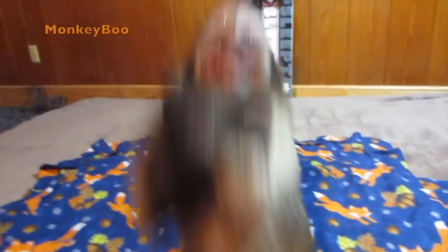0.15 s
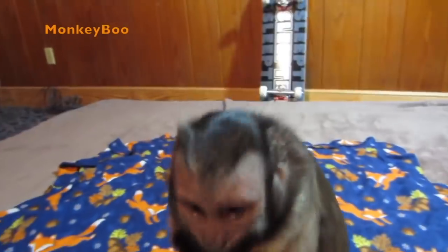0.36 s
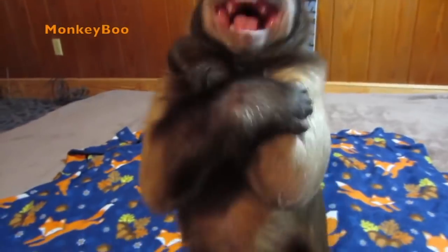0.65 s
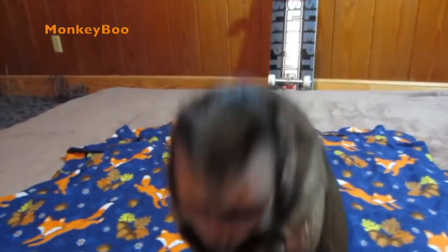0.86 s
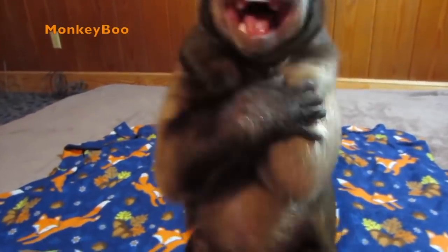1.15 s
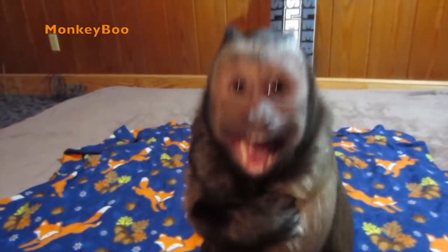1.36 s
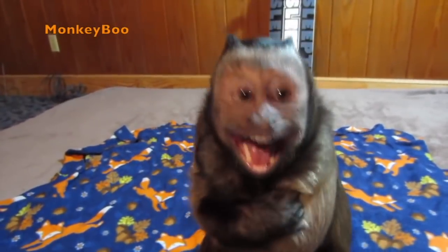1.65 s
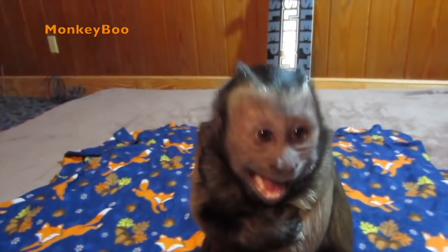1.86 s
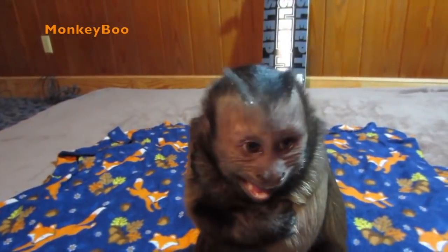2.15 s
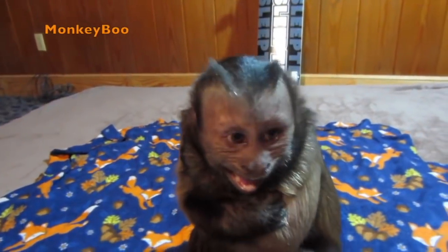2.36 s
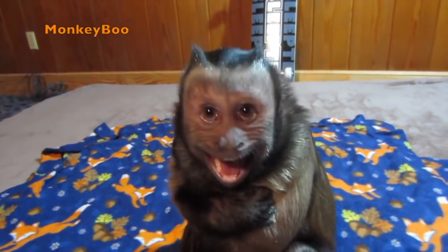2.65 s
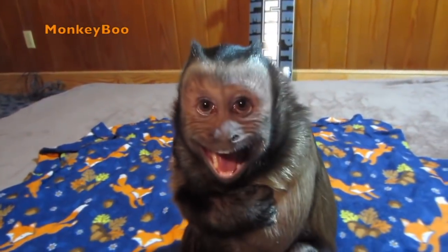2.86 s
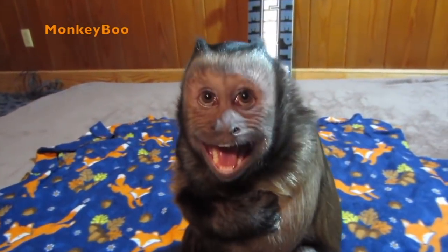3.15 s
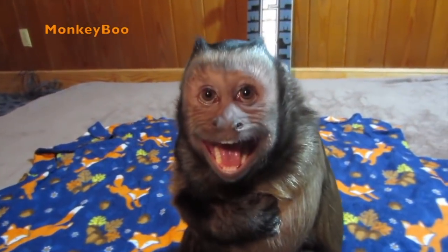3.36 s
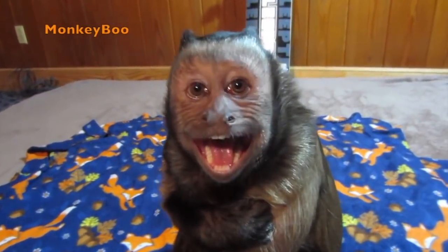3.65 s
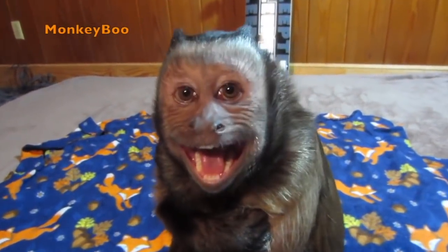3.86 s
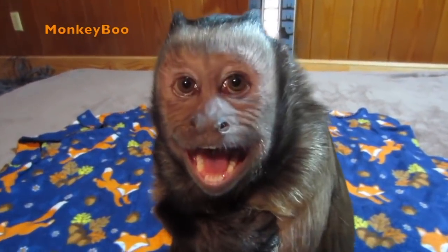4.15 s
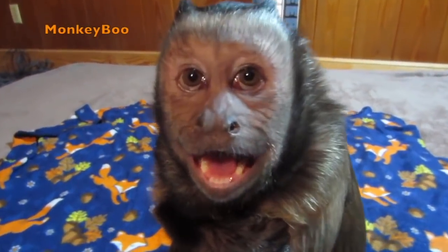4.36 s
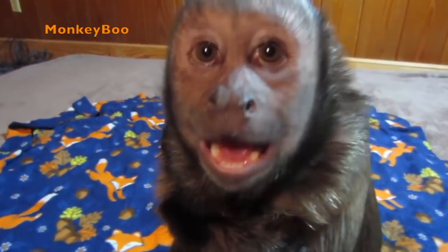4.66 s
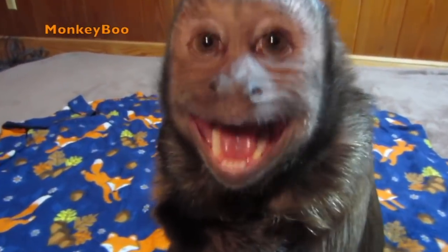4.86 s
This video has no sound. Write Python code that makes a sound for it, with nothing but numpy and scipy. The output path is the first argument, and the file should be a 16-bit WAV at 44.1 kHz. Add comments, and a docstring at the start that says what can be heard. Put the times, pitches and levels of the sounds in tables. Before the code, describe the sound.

High, piercing monkey whistles: a quick chattering run, a torn screech, three drawn-out calls, a falling squeak and final little chirps in a quiet room.

```python
"""Monkey chirping in a panelled room

A small monkey on a bed chirps close by: a high gliding whistle, built from a few sine waves.
Slow pulses through mouth resonances make short low rasps; a torn whistle with hiss makes one screech.
Long calls plunge at the end. A falling squeak, faint clicks, a soft bump and a rustle, made of
tones and shaped noise, come between. Fading noise gives the room's echo, over quiet tone and rumble."""
import sys
import numpy as np
from scipy import signal
from scipy.fft import rfft, irfft, next_fast_len
from scipy.io import wavfile
from scipy.ndimage import uniform_filter1d, map_coordinates

SR = 44100
rng = np.random.default_rng(int(sys.argv[2]) if len(sys.argv) > 2 else 0)


def store_pcm(level_fs):
    """Save levels as 16-bit WAV."""
    pcm = np.round(np.clip(level_fs, -1, 1) * 32767).astype(np.int16)
    wavfile.write(sys.argv[1], SR, np.atleast_2d(pcm).T)


N = 221539
TIME = np.arange(N) / SR
TOP_HZ = 15780  # no sound is kept above this

# short arched chirps: start t/s, crest t/s, end t/s, first f/Hz, crest f/Hz, last f/Hz,
# mid-chirp level/dB, swell from start to end/dB, octave level at the crest pitch/dB
CHIRPS = [(0.022, 0.036, .059, 3043, 3285, 2470, -27.5, -2, -31.5),
          (0.149, 0.161, .178, 2930, 3160, 3014, -31.5, 6.5, -35),
          (0.213, 0.253, .258, 2697, 3210, 3040, -34.5, -4, -36.5),
          (0.286, 0.303, .312, 3290, 3390, 3080, -31, -1, -29),
          (0.361, 0.363, .398, 3180, 3274, 2573, -27, 1.5, -35),
          (0.398, 0.41, .410, 2644, 2580, 2590, -39, 0, -41.5),
          (0.424, 0.436, .458, 2760, 2833, 2554, -36.5, -1, -42),
          (0.69, .713, .734, 3570, 3796, 3114, -27.5, 8, -30),
          (.757, 0.801, .830, 3290, 3838, 3560, -31, -0.5, -26.5),
          (0.852, 0.898, .920, 3276, 3530, 3330, -30, 7.5, -32.5),
          (3.937, 3.965, 3.995, 3790, 3694, 2755, -35, 18, -41.5),
          (4.101, 4.121, 4.171, 3283, 3410, 2734, -29.5, 13, -39.5),
          (4.822, 4.845, 4.854, 2980, 3170, 2550, -30.5, 10, -41.5),
          (4.908, 4.925, 4.933, 2870, 3200, 2570, -29, -9, -42.5),
          (4.962, 4.98, 5.001, 3145, 3184, 2570, -26, 4.5, -35)]
FALL_POWER = 1.9  # after the crest the pitch falls ever faster
TUMBLE_DB = 8.5  # strength a chirp loses as its pitch tumbles
DULLING_DB_PER_OCTAVE = 20  # the octave tone and overtones fade as the pitch leaves the crest

# pitch of a short call that rises and sags, and of the high call that leads into the screech: t/s, f/Hz
SHORT_PITCH = [(0.483, 2710), (0.519, 2930), (0.539, 3350), (0.557, 3480), (0.597, 3343), (0.611, 3064),
               (0.655, 2950)]
HIGH_PITCH = [(0.959, 3190), (0.976, 3450), (0.996, 3466), (1.024, 2970), (1.046, 3323), (1.144, 3963),
              (1.198, 3713), (1.246, 3992), (1.278, 3775), (1.338, 4018), (1.378, 3918), (1.444, 3929),
              (1.51, 3778), (1.58, 3683), (1.622, 3898), (1.653, 3610)]
# strength of those calls: t/s, fundamental level/dB, octave level/dB
SHORT_LEVEL = [(0.483, -44, -50.5), (0.591, -24.5, -34.5), (0.615, -26.5, -40.5), (0.631, -32.5, -39.5),
               (0.655, -43.5, -70.5)]
HIGH_LEVEL = [(0.959, -33, -35), (1.042, -34.5, -39), (1.072, -41.5, -55.5), (1.124, -25, -33),
              (1.146, -22.5, -36), (1.2, -35.5, -27.5), (1.308, -24.5, -37), (1.334, -24, -27),
              (1.37, -27, -33.5), (1.396, -26, -53.5), (1.408, -29, -37), (1.586, -26.5, -31),
              (1.598, -28.5, -45.5), (1.653, -26, -32)]
# pitch of three long sagging calls, one list each: t/s, f/Hz
LONG_PITCH = [
    [(1.908, 3940), (1.938, 4020), (1.99, 3360), (2.042, 3988), (2.098, 3814), (2.168, 3840), (2.23, 3493),
     (2.268, 3692), (2.302, 3664), (2.342, 3272), (2.394, 3577), (2.47, 2740)],
    [(2.647, 3860), (2.675, 3994), (2.719, 3317), (2.749, 3650), (2.777, 3687), (2.813, 3496),
     (2.841, 3700), (2.869, 3555), (2.907, 3653), (2.979, 3409), (3.015, 3480), (3.049, 3292), (3.07, 2878)],
    [(3.282, 3704), (3.308, 3630), (3.346, 3100), (3.362, 2735), (3.382, 2717), (3.398, 3135),
     (3.434, 3340), (3.474, 3277), (3.506, 3371), (3.566, 3356), (3.67, 3117), (3.685, 2854)],
]
# their strength, one list each: t/s, fundamental level/dB, octave level/dB
LONG_LEVEL = [
    [(1.908, -49.5, -73.5), (1.92, -37.5, -59.5), (1.954, -37, -45), (2.194, -29.5, -43),
     (2.235, -27.5, -35), (2.43, -28, -33), (2.47, -27.5, -38.5)],
    [(2.647, -37.5, -56.5), (2.665, -29.5, -53.5), (2.713, -27.5, -34), (2.751, -29, -38.5),
     (2.941, -25.5, -35.5), (3.029, -26.5, -37), (3.049, -26.5, -33), (3.07, -23, -37.5)],
    [(3.282, -41, -51.5), (3.312, -27.5, -33), (3.338, -31.5, -38.5), (3.36, -22.5, -40.5),
     (3.426, -33, -41.5), (3.658, -27.5, -36.5), (3.685, -25, -38.5)],
]
# each long call ends in the same plunge: length, fall in pitch, fall in level, roughness (share of pitch)
PLUNGE_S, PLUNGE_OCTAVES, PLUNGE_DB, PLUNGE_JITTER = 0.029, 0.41, 25.5, 0.083
# a whistle starts with its fundamental a little strong and its overtones weak, and settles this fast
BLOOM_S, FIRST_BLOOM_DB, OVERTONE_BLOOM_DB = 0.0014, -1.5, 18.5
# third and fourth harmonics of the whistle, compared with its octave: f/Hz, level/dB
OVERTONES = [(8300, -9), (9700, -13), (11900, -26.5), (12800, -35.5), (14300, -25.5), (16000, -37)]

# the voice breaks into a low rasp: start t/s, end t/s, first f/Hz, last f/Hz, level/dB,
# fundamental level/dB, mouth resonance f/Hz, jitter/share of pitch
RASPS = [(0.176, 0.213, 1042, 864, -44, -53.5, 2420, 0.1),
         (0.257, 0.289, 1000, 910, -39.5, -50, 2580, 0.08), (0.311, 0.36, 985, 897, -32, -47, 2807, 0.031),
         (0.409, 0.421, 1060, 919, -45, -49.5, 2870, .03), (0.457, 0.48, 1280, 1017, -48, -50, 2674, .012),
         (0.73, 0.753, 1485, 1144, -35.5, -44, 2620, 0.031),
         (0.828, 0.857, 1034, 958, -33.5, -44.5, 3970, 0.047),
         (0.919, 0.958, 979, 893, -30.5, -44, 4220, 0.052),
         (4.945, 4.957, 2200, 1257, -52, -51, 3630, 0.0064)]
# the screech: t/s, level of the whole screech/dB, centre f/Hz
SCREECH = [(1.648, -39, 3640), (1.654, -30, 3500), (1.731, -30, 3500), (1.749, -27, 2970),
           (1.767, -31, 2664), (1.792, -51.5, 2474)]
# hiss in the screech: f/Hz, level/dB per Hz
SCREECH_HISS = [(1800, -19.5), (4200, 0), (5400, -5.5), (7800, -1.5), (11000, -13.5), (15500, -28.5)]
# the falling squeak: t/s, pitch f/Hz, level/dB, extra overtone level/dB
SQUEAK = [(4.584, 2916, -63, -17.5), (4.590, 2491, -21.5, -31.5), (4.593, 2107, -21, -41),
          (4.599, 1851, -36, 2), (4.608, 1319, -27.5, -11), (4.622, 785.5, -29.5, 6),
          (4.627, 523.6, -34, -6.5), (4.645, 197, -40.5, 9), (4.664, 150, -56.5, -16)]
# the voice drops away after a whistle: start t/s, first f/Hz, starting level/dB
DROPS = [(2.489, 1032, -43), (3.098, 965, -43), (3.702, 1029, -42), (3.992, 1306, -42),
         (4.169, 1400, -37.5)]
DROP_S, DROP_END_HZ = .028, 443  # every drop lasts as long and ends as low
# faint clicks: some are crackles of the overdriven limiter at the loudest moments of the calls,
# the late ones mouth clicks: t/s, level before the common snap_db cut/dB
CLICKS = [(0.056, -29), (2.434, -38), (3.058, -34.5), (3.364, -39.5), (3.681, -38.5), (4.765, -40),
          (4.814, -40.5), (4.853, -36), (4.89, -35)]
# how a wide open mouth colours the voice: f/Hz, level/dB
OPEN_MOUTH = [(500, -20.5), (1800, -12.5), (2800, -6.5), (5200, -8.5), (7400, -4), (8400, -17),
              (10000, -20), (11500, -39.5), (15500, -45)]
# how a relaxed mouth colours the voice: f/Hz, level/dB
SLACK_MOUTH = [(120, -9.5), (560, -14.5), (850, 3), (1250, -5.5), (1800, -16.5), (2700, 1.5), (4000, -19.5),
               (9000, -68.5)]

# time the room's echo takes to fade by 60 dB: f/Hz, fading time/s
ROOM = [(300, 0.84), (2500, 0.44), (14000, 0.58)]
# colour of the quiet room: f/Hz, level/dB per Hz
ROOM_TONE = [(30, -0.5), (300, -7.5), (4000, -18.5), (15500, -38.5)]
# strength of the low rumble: t/s, level/dB
RUMBLE = [(0, -77.5), (4.35, -94.5), (4.43, -69), (5, -72.5)]


def amp(db):
    """Turn decibels into a plain gain."""
    return 10 ** (np.asarray(db) / 20)


def unit(x):
    """Scale a sound to rms 1."""
    return x / np.sqrt(np.mean(x ** 2) + 1e-20)


def along(points, hz):
    """Read a (Hz, value) curve with straight lines on a log frequency axis."""
    f, value = np.transpose(points)
    return np.interp(np.log(hz + 1), np.log(f + 1), value)


def curves(rows, t):
    """Read each column after the time column at the times t."""
    s, *columns = np.transpose(rows)
    return [np.interp(t, s, column) for column in columns]


def wobble(t, rate):
    """A smooth random curve with this many random points a second."""
    return map_coordinates(rng.standard_normal(8192), [(t - t[0]) * rate], mode="wrap")


def span(start, end, edge):
    """Sample numbers, times and soft-edged gate (a fade in and out) of one sound."""
    i = np.flatnonzero((TIME > start - edge) & (TIME < end + edge))
    t = TIME[i]
    inside = np.minimum(t - start, end - t) / edge
    return i, t, .5 + .5 * np.sin(np.pi / 2 * np.clip(inside, -1, 1))


def phase_of(hz):
    """Add up a moving pitch into a running phase."""
    return 2 * np.pi * np.cumsum(hz) / SR


def ring(x, hz, width_hz):
    """Let a sound excite one resonance."""
    b, a = signal.iirpeak(hz, hz / width_hz, SR)
    return signal.lfilter(b, a, x)


def coloured(x, spectrum):
    """Filter a sound to a given spectrum, with no ringing ahead of it (minimum phase)."""
    size = 1024
    gain = amp(along(spectrum, np.fft.rfftfreq(size, 1 / SR)))
    cepstrum = irfft(np.log(gain))
    # folding the second half onto the first makes the filter respond only after its input
    cepstrum[1:size // 2] *= 2
    cepstrum[size // 2 + 1:] = 0
    response = irfft(np.exp(rfft(cepstrum)))
    return signal.fftconvolve(x, response)[:len(x)]


def noise(spectrum, size):
    """Random noise of rms 1, shaped to a given spectrum."""
    m = next_fast_len(size, real=True)
    gain = amp(along(spectrum, np.fft.rfftfreq(m, 1 / SR)))
    shaped = irfft(rfft(rng.standard_normal(m)) * gain, m)
    return unit(shaped[:size])


def pulses(hz, count):
    """Vocal-fold pulses: equally strong harmonics of a moving pitch add up to sharp peaks."""
    k = np.arange(1, count + 1)[:, None]
    audible = k * hz < TOP_HZ
    return np.sum(np.cos(k * phase_of(hz)) * audible, axis=0)


def whistle(t, hz, first_db, octave_db, waver=0.0032, jitter=0.0037, shimmer_db=0.93,
            overtone_drift_db=2.0, hiss_db=-34, pressing=0.12, usual_octave_db=-7):
    """A nearly pure tone with weaker harmonics and a trace of hiss; a stronger octave enriches the rest."""
    hz = uniform_filter1d(hz, size=200, mode="nearest")
    hz = hz * (1 + waver * wobble(t, 45) + jitter * wobble(t, 200))
    phase = phase_of(hz)
    unsettled = np.exp(-(t - t[0]) / BLOOM_S)
    first_db = first_db - FIRST_BLOOM_DB * unsettled
    octave_db = octave_db - OVERTONE_BLOOM_DB * unsettled
    upper_db = octave_db + pressing * (octave_db - first_db - usual_octave_db)
    tone = amp(first_db) * np.sin(phase) + amp(octave_db) * np.sin(2 * phase)
    for k in (3, 4):
        level_db = upper_db + along(OVERTONES, k * hz) + overtone_drift_db * wobble(t, 35)
        tone += amp(level_db) * np.sin(k * phase)
    tone *= np.sqrt(2) * amp(shimmer_db * wobble(t, 130)) * beating(t)
    hiss = amp(octave_db + hiss_db) * noise(OPEN_MOUTH, len(t))
    return tone + hiss


def beating(t, start=1.496, depth=0.4, decay=0.02, beat_hz=830):
    """A second, slow and ragged vibration sets in quickly and dies away: each harmonic flutters."""
    age = np.maximum(t - start, 0)
    ragged_hz = beat_hz * (1 + .13 * wobble(t, 1300))
    beat = np.sin(phase_of(ragged_hz)) + .2 * wobble(t, 3000)
    swell = (1 - np.exp(-age / .002)) * np.exp(-age / decay)
    return 1 + depth * swell * beat


def chirp(start, crest, end, first_hz, crest_hz, last_hz, db, swell_db, octave_db):
    """The pitch eases to a crest and tumbles off it; the voice is brightest at the crest pitch."""
    i, t, gate = span(start, end, edge=.0025)
    rise = np.sin(np.pi / 2 * np.interp(t, [start, crest], [0, 1])) ** 2
    fall = np.interp(t, [crest, end], [0, 1]) ** FALL_POWER
    hz = first_hz + (crest_hz - first_hz) * rise + (last_hz - crest_hz) * fall
    effort_db = swell_db * np.interp(t, [start, end], [-.5, .5]) - TUMBLE_DB * fall ** 2
    dull_db = DULLING_DB_PER_OCTAVE * np.abs(np.log2(hz / crest_hz))
    return i, gate * whistle(t, hz, db + effort_db, octave_db + effort_db - dull_db)


def call(pitch, level, plunge_s=0):
    """A held whistle; if it is let go at the end, pitch and level plunge together."""
    held_until = pitch[-1][0]
    i, t, gate = span(pitch[0][0], held_until + plunge_s, edge=.0025)
    hz, = curves(pitch, t)
    first_db, octave_db = curves(level, t)
    plunge = np.maximum(t - held_until, 0) / PLUNGE_S
    fade_db = PLUNGE_DB * plunge ** 2
    roughness = PLUNGE_JITTER * plunge ** 2 * wobble(t, 900)
    hz = hz / 2 ** (PLUNGE_OCTAVES * plunge) * (1 + roughness)
    return i, gate * whistle(t, hz, first_db - fade_db, octave_db - fade_db / 2)


def rasp(start, end, first_hz, last_hz, db, fundamental_db, peak_hz, jitter, width_hz=420,
         upper_hz=6400, upper_width_hz=800, upper=0.5, leak=0.2):
    """The folds slip into slow wavering pulses, strong and weak in turn, that ring two mouth resonances."""
    i, t, gate = span(start, end, edge=.002)
    unsteady = .04 * wobble(t, 130) + jitter * wobble(t, 1000)
    hz = np.interp(t, [start, end], [first_hz, last_hz]) * (1 + unsteady)
    phase = phase_of(hz)
    # air escapes once a cycle
    puffs = unit(rng.standard_normal(len(t)) * (1 + np.cos(phase)) ** 2)
    # half the phase makes every other pulse weaker
    strength_db = 2.2 * wobble(t, 800) + 1.5 * np.cos(phase / 2)
    folds = unit(pulses(hz, count=16)) * amp(strength_db) + 3 * jitter * puffs
    lower_ring = ring(folds, peak_hz, width_hz)
    upper_ring = ring(folds, upper_hz, upper_width_hz)
    voice = coloured(lower_ring - upper * upper_ring + leak * folds, OPEN_MOUTH)
    return i, gate * (amp(db) * unit(voice) + amp(fundamental_db) * unit(np.sin(phase)))


def screech(octave_db=-15, hiss_db=-7, hum_db=-23, rattle_db=-8, rattle_hz=4200, rattle_width_hz=700):
    """Slow, chaotic flapping of the folds tears the whistle into sidebands, ringing pulses and hiss puffs."""
    i, t, gate = span(SCREECH[0][0], SCREECH[-1][0], edge=0.0026)
    db, hz = curves(SCREECH, t)
    phase = phase_of(hz + 170 * wobble(t, 1500))
    slow_hz = 860 * (1 + .09 * wobble(t, 900))
    flapping = np.cos(phase_of(slow_hz))
    tearing = 1 + .55 * flapping + .5 * wobble(t, 1100)
    strand = unit((np.sin(phase) + amp(octave_db) * np.sin(2 * phase)) * tearing)
    clusters = amp(2 * wobble(t, 300))  # the pulses come stronger and weaker in groups
    rattle = unit(ring(pulses(slow_hz, count=9) * clusters, rattle_hz, rattle_width_hz))
    hiss = unit(noise(SCREECH_HISS, len(t)) * (1 + flapping / 2) * clusters)
    effort = (hz / hz[0]) ** 2  # as the pitch sags, the harshness goes first
    harshness = effort * (amp(rattle_db) * rattle + amp(hiss_db) * hiss)
    hum = amp(hum_db) * flapping * clusters ** 2
    return i, gate * amp(db) * unit(strand + harshness + hum)


def squeak(jitter_hz=22, chest_hz=200, closed_hz=800, opening=0.39):
    """The pitch plunges while the closing mouth lowers its resonances; the bottom is uneven and chesty."""
    i, t, gate = span(SQUEAK[0][0], SQUEAK[-1][0], edge=0.0018)
    hz, db, overtones_db = curves(SQUEAK, t)
    hz = hz + jitter_hz * wobble(t, 702)
    phase = phase_of(hz)
    mouth = np.maximum(hz / closed_hz, 1) ** opening  # the resonances lie this many times higher
    k = np.arange(1, 8)[:, None]
    harmonic_db = along(SLACK_MOUTH, k * hz / mouth) + overtones_db * (k > 1)
    voice = np.sum(amp(harmonic_db) * np.sin(k * phase), axis=0)
    slack = np.minimum(chest_hz / hz, 1) ** 2
    voice += slack * (noise(SLACK_MOUTH, len(t)) + 1.2 * np.sin(phase))
    # even out the strength, so that the table alone sets the level
    strength = np.sqrt(np.abs(uniform_filter1d(voice ** 2, size=220)) + 1e-12)
    return i, gate * amp(db) * voice / strength


def drop(start, first_hz, db, jitter=0.035, fade_db=19):
    """The vocal folds slacken: pitch and level sink together."""
    i, t, gate = span(start, start + DROP_S, edge=0.0033)
    progress = (t - start) / DROP_S
    hz = first_hz * (DROP_END_HZ / first_hz) ** progress * (1 + jitter * wobble(t, 700))
    folds = pulses(hz, count=12) - np.cos(phase_of(hz)) / 2  # halves the fundamental
    return i, gate * amp(db - fade_db * progress) * unit(coloured(folds, SLACK_MOUTH))


def click(s, db, t60=0.011, snap_db=-13):
    """A tiny snap: a burst of noise that fades at a rate of 60 dB in t60 seconds."""
    i, t, gate = span(s, s + .01, edge=.0006)
    snap = noise([(200, -6.5), (1100, 7.5), (6000, 4), (13000, -25)], len(t))
    return i, gate * amp(db + snap_db - 60 * (t - s) / t60) * snap


def bump(start=1.338, end=1.368, db=-58):
    """The monkey settles on the bedding with a dull bump of low noise."""
    i, t, gate = span(start, end, edge=0.0055)
    return i, gate * amp(db) * noise([(420, -19.5), (3000, -57)], len(t))


def rustle(start=4.405, end=4.53, db=-74):
    """A soft rustle as the monkey leans forward: noise through one wide resonance."""
    i, t, gate = span(start, end, edge=.02)
    cloth = ring(noise(ROOM_TONE, len(t)), hz=4200, width_hz=4700)
    return i, gate * amp(db) * unit(cloth)


def room(x, wet_db, early=1.3, early_s=.02, ring_hz=2750, ring_width_hz=300, ringing=1.0):
    """Panelled walls answer with dense early echoes, then a short tail that rings in one narrow band."""
    hz, t, grains = signal.stft(rng.standard_normal(SR // 2), SR, nperseg=256)
    fading = amp(-60 * t / along(ROOM, hz)[:, None])  # each band at its own speed
    early_boost = 1 + early * np.exp(-t / early_s)
    tail = signal.istft(grains * fading * early_boost, SR, nperseg=256)[1]
    tail = tail + ringing * ring(tail, ring_hz, ring_width_hz)
    # the first echo comes about 6 ms late
    tail = np.pad(tail / np.linalg.norm(tail), (SR // 160, 0))
    return amp(wet_db) * signal.fftconvolve(x, tail)[:N]


def lingering(db=-60):
    """At the start the room still rings from an earlier chirp, heard as fading noise."""
    t60 = np.mean(ROOM, axis=0)[1]
    colour = [(2300, -14), (3000, -4.5), (3900, -21.5), (6500, -12.5), (15000, -42.5)]
    return amp(db - 60 * TIME / t60) * noise(colour, N)


def background(tone_db):
    """Steady noise makes the quiet room tone; deep noise makes a rumble that swells near the end."""
    rumble_db, = curves(RUMBLE, TIME)
    rumble = noise([(35, 2.0), (200, -21.0), (3000, -90.5)], N)
    return amp(tone_db) * noise(ROOM_TONE, N) + amp(rumble_db) * rumble


def scene():
    """All the close sounds, their echo and the quiet room."""
    sounds = [chirp(*row) for row in CHIRPS]
    sounds += [call(SHORT_PITCH, SHORT_LEVEL), call(HIGH_PITCH, HIGH_LEVEL)]
    sounds += [call(pitch, level, PLUNGE_S) for pitch, level in zip(LONG_PITCH, LONG_LEVEL)]
    sounds += [rasp(*row) for row in RASPS]
    sounds += [drop(*row) for row in DROPS]
    sounds += [click(*row) for row in CLICKS]
    sounds += [screech(), squeak(), bump(), rustle()]
    close = np.zeros(N)
    for i, sound in sounds:
        close[i] += sound
    mix = close + room(close, wet_db=-19) + lingering() + background(tone_db=-77.5)
    return mix[None]  # one channel


def record(dry, ceiling=0.095, release=0.0071):
    """A limiter ducks loud peaks almost at once and recovers in milliseconds; the top is then cut off."""
    excess = np.log(np.maximum(np.abs(dry) / ceiling, 1))
    # a running maximum on a slope: the ducking holds at a peak, then eases off steadily
    leak = TIME / release
    held = np.maximum.accumulate(excess + leak, axis=-1) - leak
    gain = np.exp(-uniform_filter1d(held, size=10))
    m = next_fast_len(N + SR // 2)
    kept = np.fft.rfftfreq(m, 1 / SR) < TOP_HZ
    return irfft(rfft(dry * gain, m) * kept, m)[..., :N]


dry = scene()
out = record(dry)
store_pcm(out)
```